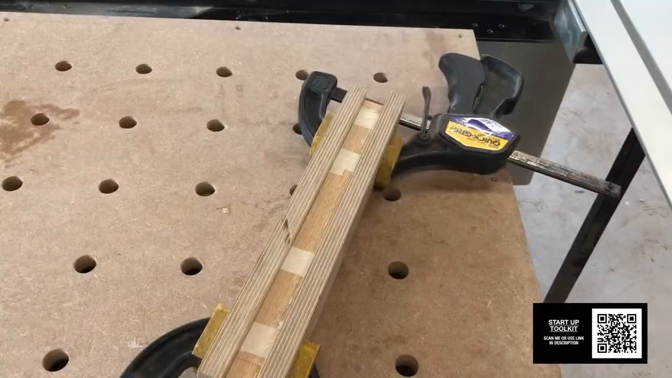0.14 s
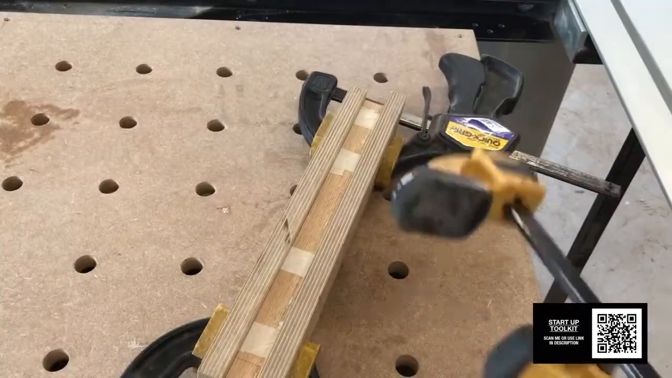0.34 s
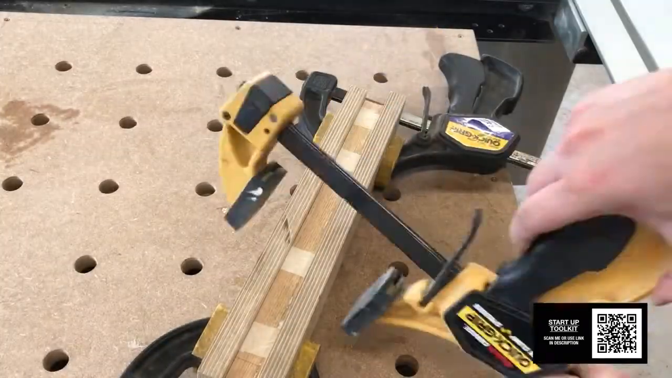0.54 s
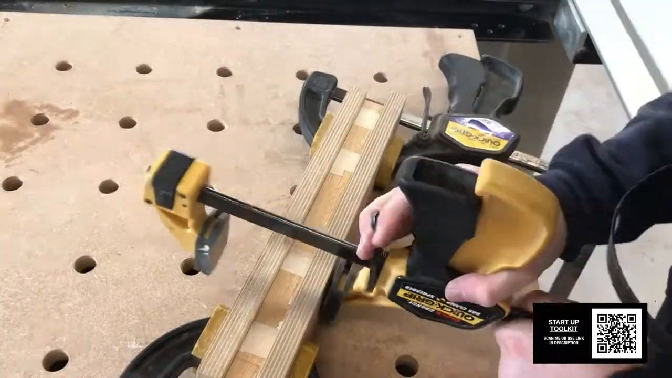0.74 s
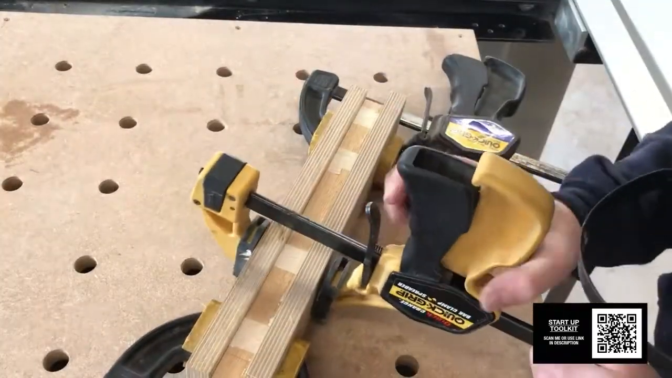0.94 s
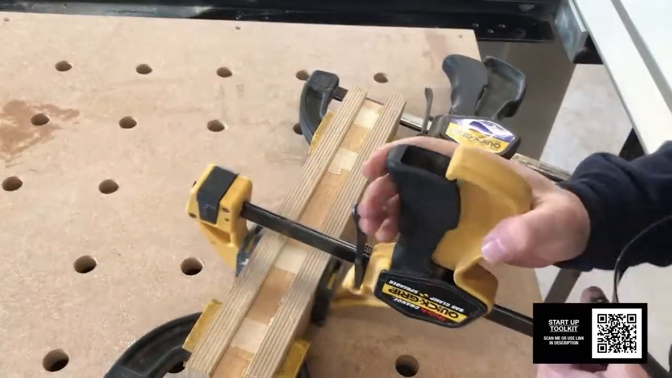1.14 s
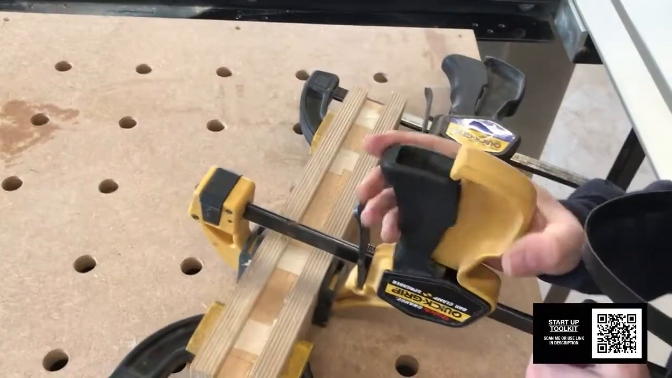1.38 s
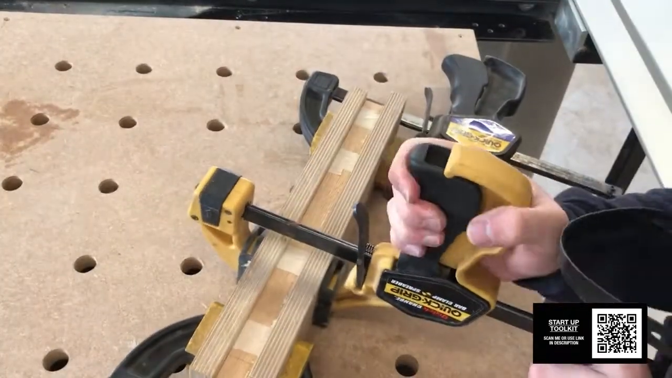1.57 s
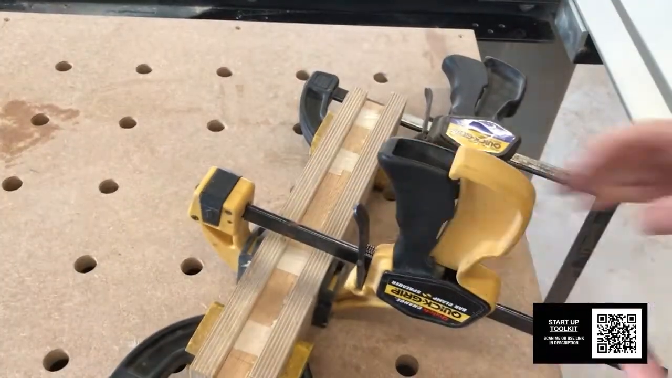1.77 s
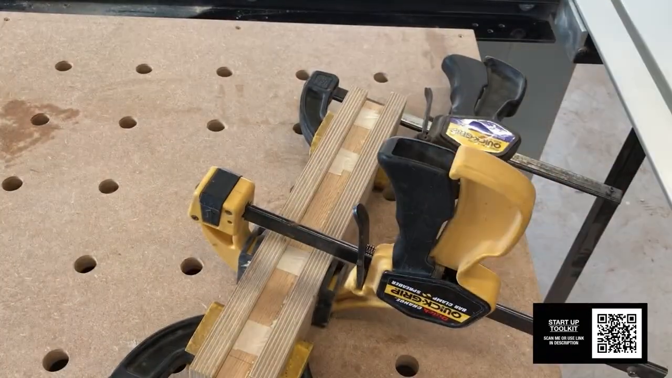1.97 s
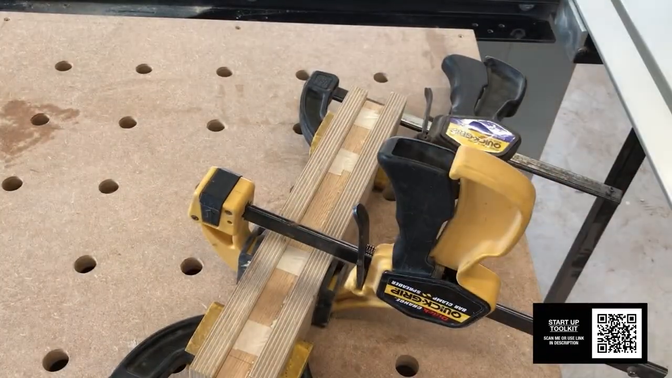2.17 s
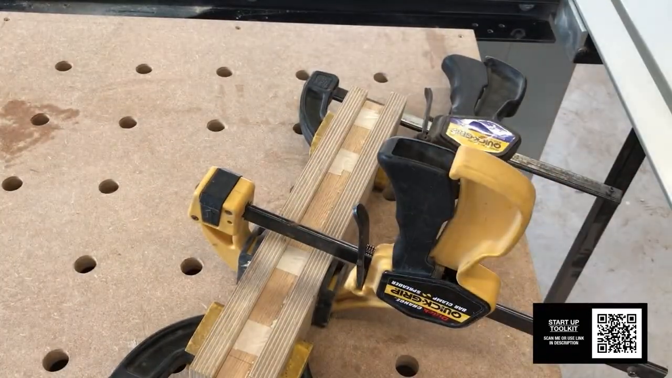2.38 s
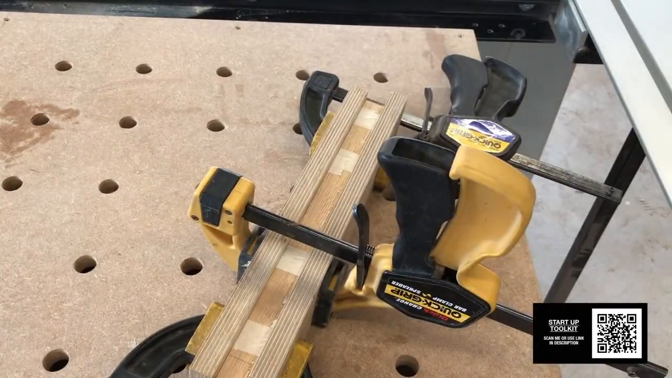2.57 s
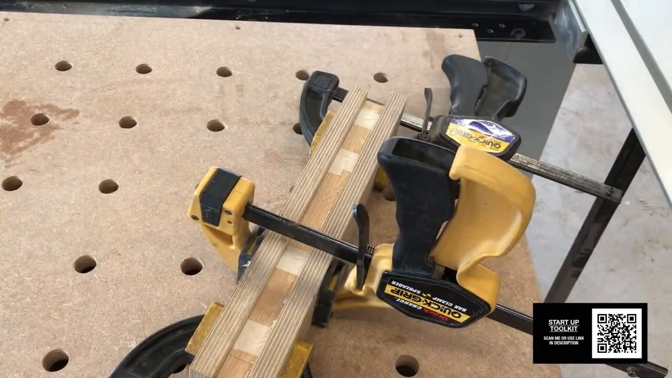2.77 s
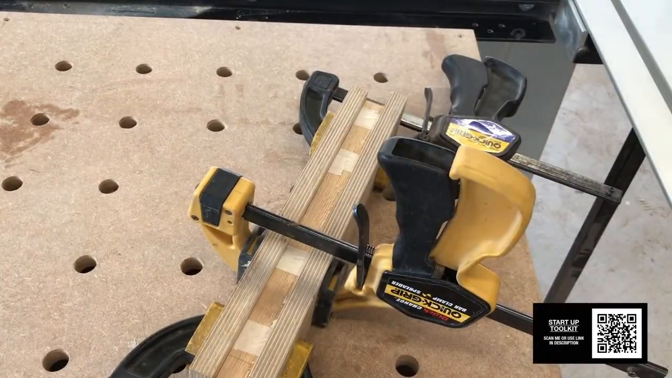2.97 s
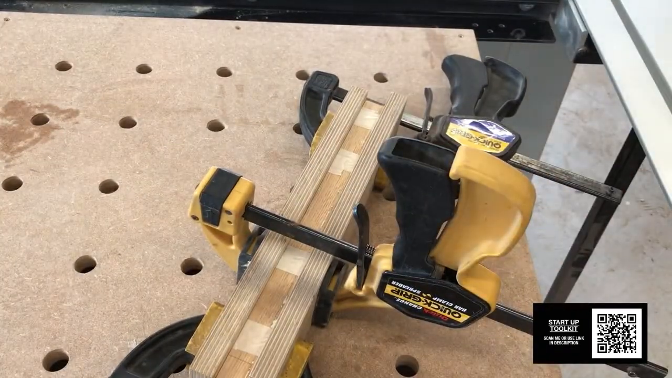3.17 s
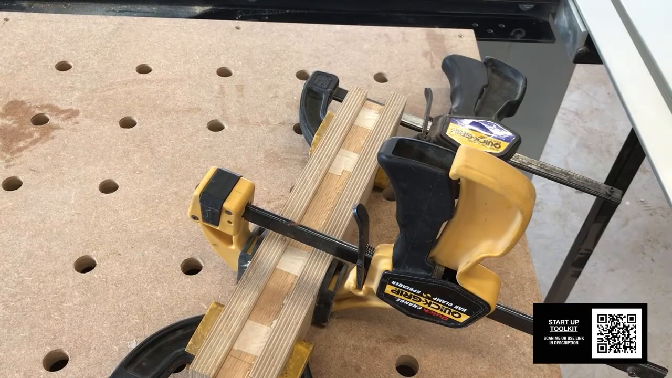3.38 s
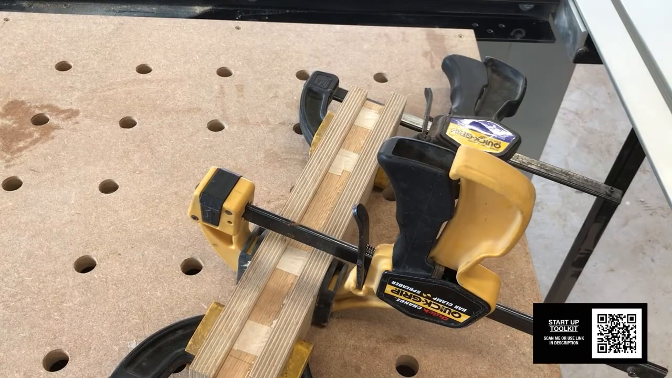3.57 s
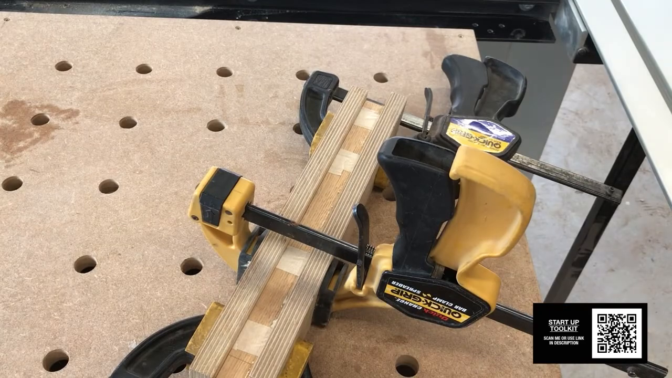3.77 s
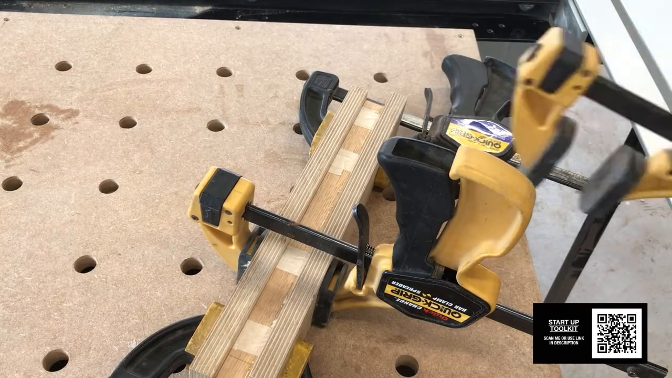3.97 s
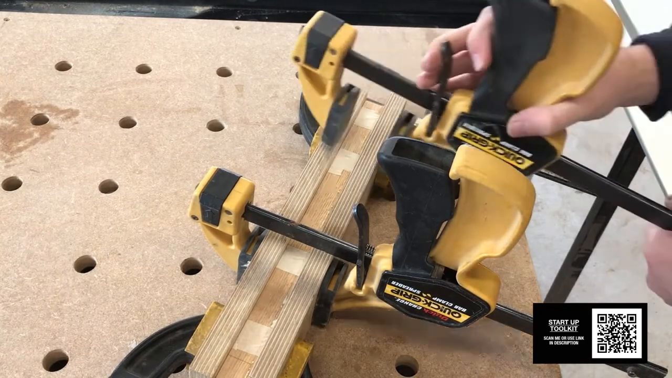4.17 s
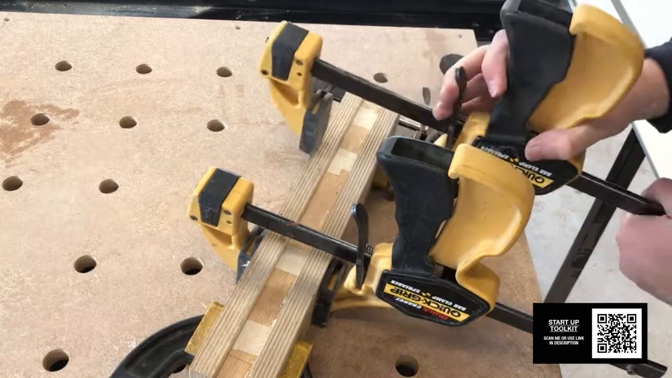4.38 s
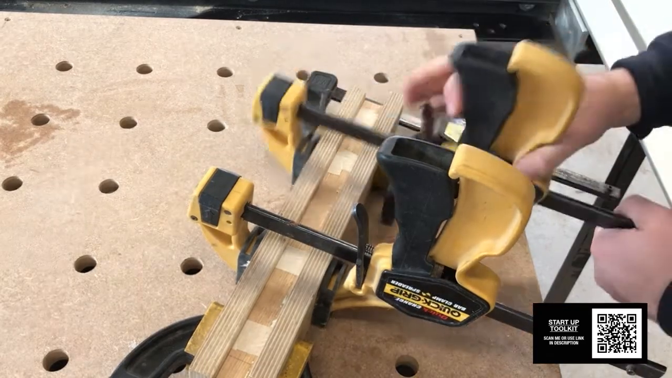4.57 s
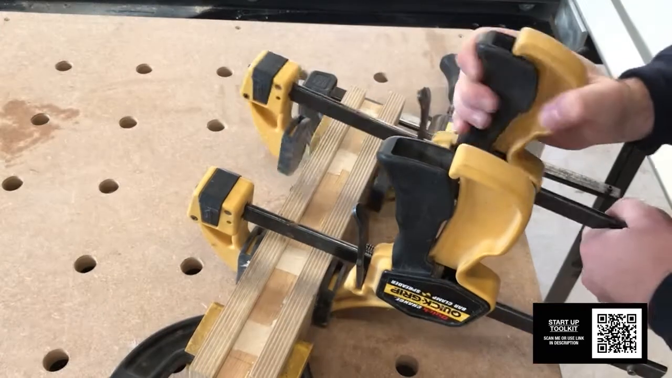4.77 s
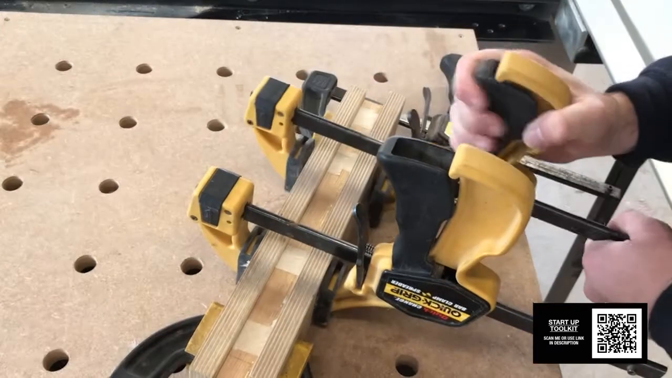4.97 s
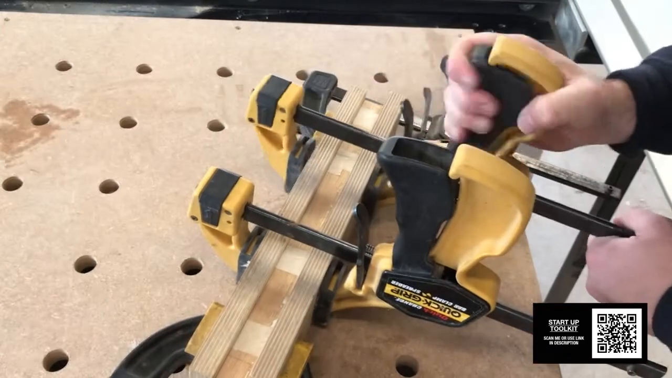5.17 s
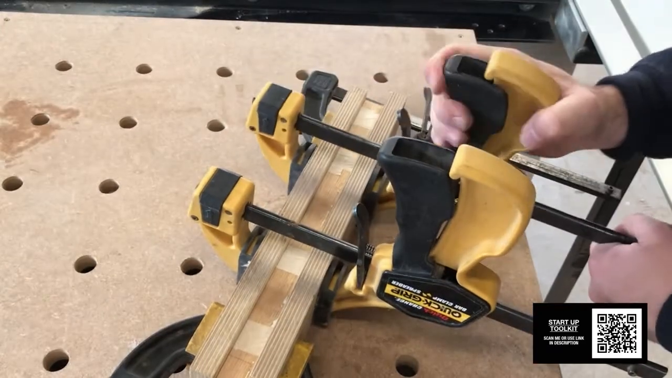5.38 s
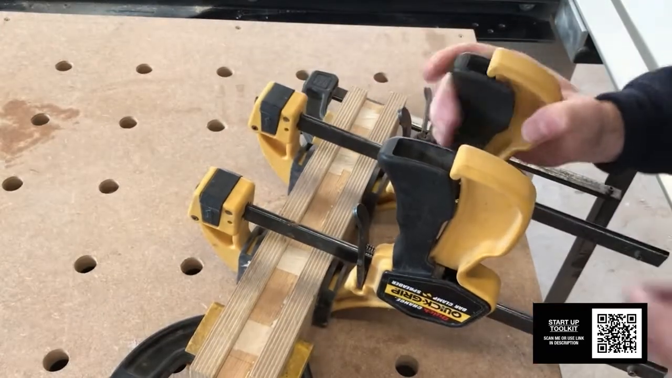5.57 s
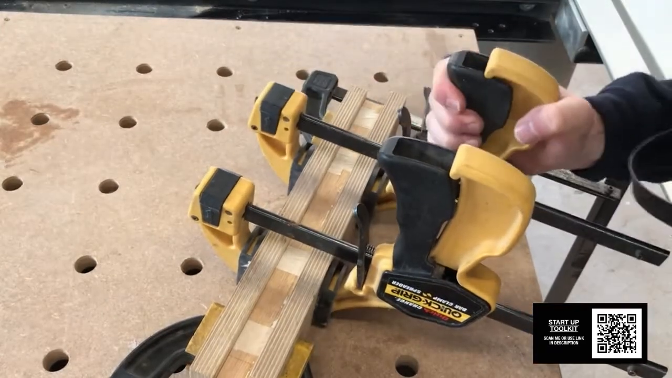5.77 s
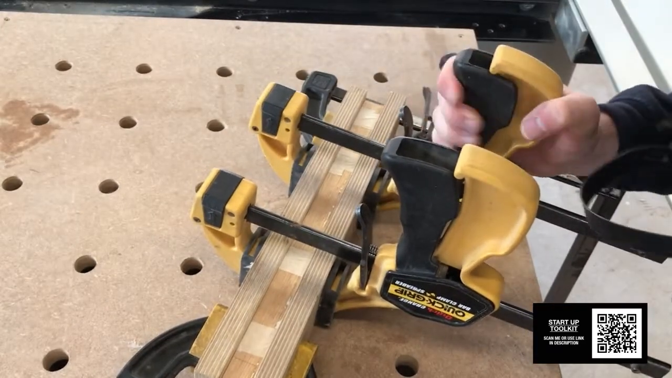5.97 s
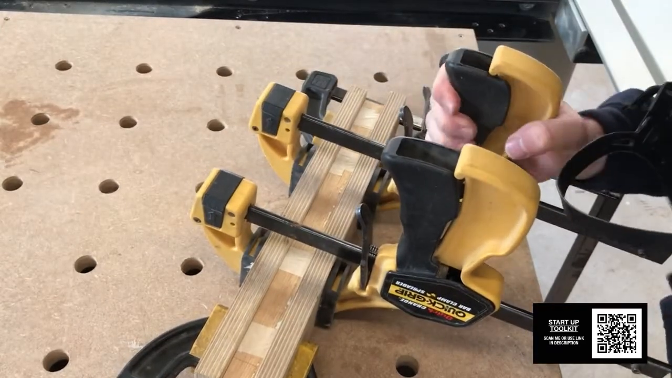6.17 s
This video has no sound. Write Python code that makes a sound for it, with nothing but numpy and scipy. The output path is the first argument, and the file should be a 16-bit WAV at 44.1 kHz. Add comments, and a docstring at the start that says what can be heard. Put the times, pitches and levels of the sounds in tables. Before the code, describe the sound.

A close recording in a small workshop, with faint low rumble, hiss and a short room echo. It opens with a few light steel ticks and a soft hum that dies within half a second. From about 0.6 seconds a bar clamp knocks against a plywood strip on a bench, mixing wooden thuds, plastic clacks and sharp metal snaps. A tiny squeak comes at 1 second, the loudest thud and snap at 1.25, and lighter clicks until 1.7. A lull follows with soft swishes of sleeves and a shoe scuff near 2.6. Around 3.9 seconds a second clamp ticks and rattles faintly, then knocks on the wood from 4.2. As it tightens, its steel bar gives three short, sharp squeaks at about 4.8, 5 and 5.2 seconds and a faint one at 5.4, among clicks. Firmer knocks follow at 5.5 and 5.8, ending with light ticks and rustling just after 6.

```python
"""In a small workshop, two one-handed bar clamps are set on a plywood strip on a bench, close by.
Jaws and handles knock on the wood and make it ring, and the steel catch plates tick as they snap.
The bar squeaks because it sticks and slips as it is dragged through the plates.
Sleeves and shoes swish in between, over the room's low rumble, hiss and a brief hum."""
import sys
import numpy as np
from scipy import signal
from scipy.fft import rfft, irfft, next_fast_len
from scipy.io import wavfile
from scipy.ndimage import uniform_filter1d

SR = 44100
rng = np.random.default_rng(int(sys.argv[2]) if len(sys.argv) > 2 else 0)


def store_wav(level_fs):
    """Save 16-bit WAV to argv[1]."""
    pcm = np.round(np.clip(np.atleast_2d(level_fs), -1, 1) * 32767)
    wavfile.write(sys.argv[1], SR, pcm.T.astype(np.int16))


N = 275182
TIME = np.arange(N) / SR
BLOW = np.arange(SR // 4) / SR  # seconds within one blow
TOP_HZ, SNAP_HZ = 16200, 6640  # upper limit of the sound; middle pitch of a steel snap

# How loud the room and the handled bench rumble. Each row: time in seconds, level in dB.
RUMBLE_LEVELS = [(0.0, -71), (0.59, -68.5), (0.8, -65), (1.18, -65.5), (1.34, -67.5), (1.67, -64),
                 (1.91, -72.5), (3.75, -72), (4.45, -65), (5.09, -64.5), (5.8, -64), (6.24, -67)]


def undb(db):
    """Turn decibels into a number to multiply by."""
    return 10 ** (np.asarray(db) / 20)


def unit(x, size=None):
    """Scale x so that its first size samples have an average strength (rms) of 1."""
    return x / np.sqrt(np.mean(x[:size] ** 2) + 1e-20)


def fade(t60):
    """A fade over one blow that drops by 60 dB every t60 seconds."""
    return np.exp(-np.log(1000) * BLOW / t60)


def colour(x, points, tilt_db=0):
    """Shape the tone by (Hz, dB) points, adding tilt_db of treble per octave above 4 kHz."""
    size = 2 * next_fast_len(len(x) // 2 + 2048)
    f = np.maximum(np.arange(size // 2 + 1) * SR / size, 1)
    hz, db = np.transpose(points)
    gain_db = np.interp(np.log(f), np.log(hz), db) + tilt_db * np.log2(np.maximum(f / 4000, 1))
    # this folding keeps the filter from ringing before a sound starts
    cepstrum = irfft(np.log(undb(gain_db)))
    cepstrum[1:size // 2] *= 2
    cepstrum[size // 2 + 1:] = 0
    return irfft(rfft(x, size) * np.exp(rfft(cepstrum)))[:len(x)]


def band(x, hz, width_hz):
    """Keep only the frequencies around hz."""
    edges = np.clip([hz - width_hz / 2, hz + width_hz / 2], 20, .45 * SR)
    return signal.sosfilt(signal.butter(2, edges, "band", fs=SR, output="sos"), x)


def noise(points, size, tilt_db=0):
    """Noise of strength 1, its tone shaped by (Hz, dB) points."""
    return unit(colour(rng.standard_normal(size), points, tilt_db))


def walk(rate, size=N):
    """A smooth random wobble of strength 1 that turns about rate times a second."""
    hold = max(int(SR / rate), 1)
    steps = np.repeat(rng.standard_normal(size // hold + 2), hold)
    return unit(uniform_filter1d(steps, hold)[:size])


def add(out, start, x):
    """Mix x into out from start seconds on."""
    i = max(int(start * SR), 0)
    out[i:i + len(x)] += x[:max(N - i, 0)]


def ring(modes):
    """The fading tones of a struck object; their mix depends on where the blow lands."""
    chance = rng.standard_normal((len(modes), 3)) * [2, .004, 1]
    return sum(np.sign(side) * undb(db + extra_db)
               * np.sin(2 * np.pi * hz * (1 + detune) * BLOW) * fade(t60)
               for (hz, db, t60), (extra_db, detune, side) in zip(modes, chance))


def bass_step(at_s=2.6, glide_s=0.155):
    """Goes smoothly from 0 to 1 as the recorder's bass cut drops, once."""
    return (1 + np.tanh((TIME - at_s) / glide_s)) / 2


def rumble():
    """The room and the handled bench give a low, wavering rumble."""
    # The rumble's tone. Each row: frequency in Hz, level in dB.
    tone = [(30, -33.5), (70, -27.5), (110, 1.5), (150, -1), (230, 0.5), (330, -2), (600, -10),
            (1500, -27.5), (4000, -49.5)]
    db = np.interp(TIME, *np.transpose(RUMBLE_LEVELS)) + 1
    return noise(tone, N) * undb(db + walk(32))


def rumble_edge(high_hz=133.4, low_hz=90, fade_in_s=0.96):
    """The rumble's wavering low edge, which sinks once as the recorder's bass cut drops."""
    db = np.interp(TIME, *np.transpose(RUMBLE_LEVELS)) - 2.5
    hz = high_hz + (low_hz - high_hz) * bass_step()
    phase = 2 * np.pi * np.cumsum(hz) / SR
    edge = walk(17) * np.cos(phase) + walk(16) * np.sin(phase)
    return undb(db) * np.minimum(TIME / fade_in_s, 1) * edge


def hiss():
    """A faint hiss whose level drifts slowly."""
    # The hiss's tone. Each row: frequency in Hz, level in dB.
    tone = [(100, -5), (600, 12.5), (1500, 12), (4000, -3), (9000, -6.5), (16000, -4.5)]
    return noise(tone, N) * undb(-80 + 1.1 * walk(2.8))


def hum(hz=383):
    """One wavering note that dies away in the first second."""
    db = np.interp(TIME, [0, .28, .45, .7], [-63, -67.5, -75, -103])
    return np.sqrt(2) * np.sin(2 * np.pi * hz * TIME) * undb(db + walk(25))


def snap(hz, tilt_db):
    """A tiny steel snap: a noisy crack and a very short ping."""
    t = BLOW[:SR // 50]
    tone = [(500, -9), (2000, -5.5), (4500, 1.5), (9000, -0.5), (16000, -11.5)]
    crack = noise(tone, len(t), tilt_db) * fade(0.0051)[:len(t)]
    ping = np.sin(2 * np.pi * hz * t) * fade(0.0054)[:len(t)]
    contact = 1 - np.exp(-t / .0003)
    return unit(contact * (unit(crack) + undb(-3.5) * unit(ping)), size=SR // 250)


def ticks():
    """The catch plates sit loosely: they touch lightly, snap, then rattle once."""
    # Snaps of plates and trigger. Each row: start in seconds, level in dB, treble tilt in dB per octave.
    snaps = [(0.026, -40, 5), (0.099, -43, 2.5), (0.1944, -53.5, 4), (0.3143, -48, 0), (0.6211, -57, 10.5),
             (1.005, -45, 2.5), (1.0942, -46.5, -9), (1.1332, -53, -3.5), (1.1848, -49.5, -5),
             (1.2558, -27, -4.5), (1.305, -42, -13.5), (1.3561, -41, 5), (1.4188, -46.5, -3.5),
             (1.7114, -42, 0.5), (3.8643, -56, -0.5), (3.89, -46, 7.5), (4.195, -50.5, 3),
             (4.219, -54.5, -0.5), (4.4609, -51, 0.5), (4.5782, -46, 1.5), (4.962, -42.5, 0.5),
             (5.0568, -52, 1), (5.086, -36, 4), (5.1518, -46.5, 1), (5.1632, -37.5, 3), (5.1767, -37.5, -6),
             (5.282, -47, -4), (5.3725, -47, -9.5), (5.5342, -51, -22.5), (5.5867, -43.5, -9),
             (5.5985, -44.5, -6), (6.0158, -44, -3), (6.1522, -53.5, -12)]
    out = np.zeros(N)
    for (start, db, tilt_db), (lead, gap) in zip(snaps, rng.uniform(.3, 1, (len(snaps), 2))):
        hz = SNAP_HZ * 2 ** (0.08 * tilt_db)  # a brighter snap also rings higher
        click = undb(db) * snap(hz, tilt_db)
        add(out, start - 0.0019 * lead, undb(-27) * click)
        add(out, start, click)
        add(out, start + .013 * gap, undb(db - 20.5) * snap(hz, tilt_db))
    return out


def rattles(per_second=20):
    """Loose parts tick faintly at random while a clamp is in the hand."""
    # When a clamp is held. Each row: start in seconds, end in seconds.
    handling = [(0.0, 1.55), (3.752, 5.75)]
    out = np.zeros(N)
    for start, end in handling:
        count = int(per_second * (end - start))
        for place, force, pitch in rng.random((count, 3)):
            db = -66 + 4.5 * (2 * force - 1)
            click = snap(SNAP_HZ * 2 ** (pitch - .5), tilt_db=-5)
            add(out, start + place * (end - start), undb(db) * click)
    return out


def swishes(rise_share=.34):
    """Sleeves, shoes and sliding pads rub in short grainy swells over a faint rustle of cloth."""
    # Each row: peak time in seconds, length in seconds, level in dB, treble tilt in dB per octave.
    rubs = [(0.061, 0.044, -54, 3.5), (0.365, 0.18, -73, 2.5), (0.781, 0.049, -59, 3),
            (1.664, 0.15, -63.5, 3.5), (1.949, 0.029, -63.5, 3), (2.007, 0.029, -56, 12),
            (2.181, 0.056, -63.5, 2), (2.362, 0.052, -66.5, 1), (2.613, 0.051, -51, -2.5),
            (2.808, 0.027, -57.5, 3), (2.866, 0.044, -60.5, -2), (3.152, .17, -71.5, 2.5),
            (3.312, 0.039, -59.5, 3.5), (3.434, 0.059, -59, -2.5), (3.67, 0.038, -56, 2),
            (3.806, 0.042, -58.5, -1), (3.888, .034, -51.5, 6.5), (3.94, 0.063, -59.5, 2),
            (4.107, 0.034, -56, 3.5), (4.324, 0.035, -55, -1.5), (4.585, 0.013, -47.5, 10),
            (5.605, 0.043, -62, -13), (5.696, 0.07, -65, -1.5), (6.002, 0.089, -62, -0.5),
            (6.182, 0.088, -65.5, -3.5)]
    # The tone of rubbing. Each row: frequency in Hz, level in dB.
    tone = [(400, -2.5), (1200, -13), (2200, -1.5), (3200, 3), (5500, 3), (9000, -2), (16000, -8)]
    grain = undb(2.2 * walk(700) + 1.6 * walk(130))
    out = undb(-80.5 + 2.5 * walk(9)) * unit(grain * noise(tone, N))  # cloth never quite keeps still
    for peak, length, db, tilt_db in rubs:
        rise, fall = length * rise_share, length * (1 - rise_share)
        near = slice(*np.searchsorted(TIME, [peak - 4 * rise, peak + 4 * fall]))
        t = TIME[near] - peak
        swell = 1 / np.cosh(1.37 * t / np.where(t < 0, rise, fall))
        body = unit(band(rng.standard_normal(len(t)), hz=3370, width_hz=970))
        rub = noise(tone, len(t), tilt_db) + undb(-14.5) * body
        out[near] += undb(db) * swell * unit(grain[near] * rub)
    return out


def bend(x, lag):
    """High notes travel faster through bending wood: 1 kHz comes lag seconds later than 4 kHz."""
    f = np.arange(len(x) + 1) * SR / (2 * len(x))
    delay = lag * np.maximum(np.sqrt(4000 / np.maximum(f, 250)) - 1, 0)
    return irfft(rfft(x, 2 * len(x)) * np.exp(-2j * np.pi * np.cumsum(delay) * f[1]))[:len(x)]


def knocks():
    """A jaw or handle hits: the wood thuds, the plastic housing clacks and the bench booms."""
    # Each row: start in seconds, thud level in dB, hardness in dB (how far the clack is above the thud).
    hits = [(0.629, -61.5, -7), (0.6915, -50.5, -1), (0.733, -62, 5.5), (0.792, -60, -3), (0.813, -48.5, 1),
            (1.006, -54, -2.5), (1.0946, -45.5, 9.5), (1.1853, -59, 2), (1.2553, -28.5, -6.5),
            (1.304, -49, 11), (1.4185, -52, 0), (1.654, -50, 6), (4.195, -57.5, 0), (4.206, -51.5, 2.5),
            (4.318, -59.5, 4.5), (4.5467, -53, -10.5), (4.579, -48.5, -8), (4.603, -48, 0.5),
            (4.7072, -56.5, -1), (4.818, -50, -11), (4.894, -60, -19), (4.997, -52.5, 0.5),
            (5.192, -53.5, 10.5), (5.412, -49.5, 3), (5.5341, -42.5, 2.5), (5.7, -58.5, -2),
            (5.7828, -41.5, 1.5), (5.849, -49.5, 2), (6.162, -63, -0.5)]
    # Tones of the strip and bench top. Each row: pitch in Hz, level in dB, seconds to fade by 60 dB.
    wood_tones = [(372, -16, .07), (455, -13, .05), (505, -4, .07), (545, -3, .06), (616, -2, .1),
                  (700, -8, .045), (800, -11, .04), (880, -4, .05), (914, 1, .055), (1083, -2, .07),
                  (1143, -2, .06), (1240, -9, .04), (1365, -9, .05), (1650, -14, .035)]
    board_tone = [(150, -35), (300, -13.5), (480, 16), (1150, -5), (1800, -16.5), (4000, -41.5)]
    clack_tone = [(500, -12.5), (1100, 8), (2300, 1.5), (3600, -10.5), (6000, -13.5), (14000, -50.5)]
    boom_tone = [(40, -12), (90, -2.5), (200, -8), (340, 2), (520, -3), (1200, -40.5)]
    out = np.zeros(N)
    for start, thud_db, hard_db in hits:
        board = noise(board_tone, len(BLOW)) * fade(0.018)
        thud = unit(ring(wood_tones), size=SR // 40) + undb(-1) * unit(board, size=SR // 40)
        clack = noise(clack_tone, len(BLOW)) * fade(0.031)
        boom = noise(boom_tone, len(BLOW)) * fade(0.12) * (1 - fade(0.014))
        # the boom grows with the thud up to a limit; hard, short hits move the bench less
        boom_db = min(thud_db + 0.5, -53.5) - 0.64 * max(hard_db, 0)
        blow = undb(thud_db) * unit(thud, size=SR // 40)
        blow += undb(thud_db + hard_db) * unit(clack, size=SR // 160)
        blow += undb(boom_db) * unit(boom, size=SR // 30)
        add(out, start, bend(blow, lag=0.00108))
    return out


def drag(length, pitch_hz, surge_db, t):
    """Pitch, extra dB and roughness as the bar catches, then breaks loose louder, lower and rougher."""
    slip = (t - length + .0066) / .0038  # passes zero at the last slip, just before the end
    surge = max(surge_db, 0) * np.exp(-slip ** 2 / 2)
    catch = 0.093 * np.exp(-t / .003)  # the pitch starts high and settles
    climb = 3.6 * t  # it creeps up as the pull builds
    sag = .31 * np.tanh(max(surge_db, 0) / 6) * (1 + np.tanh(2 * slip + 1)) / 2
    rasp = np.clip(0.14 + 0.27 * surge, 0, 1)
    return pitch_hz * (1 + catch + climb) * (1 - sag), surge, rasp


def squeaks(attack_s=0.00195, release_s=0.0022):
    """The steel bar sticks and slips in the plates fast enough to make a note, which sets it ringing."""
    # Each row: start and end in seconds, pitch in Hz, level in dB, extra dB as the bar breaks loose.
    drags = [(1.016, 1.029, 2078, -36.5, 0.5), (4.7845, 4.8217, 1473, -36, 14),
             (4.977, 4.9927, 1443, -35.5, 12), (5.171, 5.201, 1444, -41.5, 17),
             (5.387, 5.425, 1376, -50, -0.5)]
    # How well the clamp gives off a squeak. Each row: frequency in Hz, level in dB.
    clamp_tone = [(500, -20), (1300, -6.5), (2000, -12.5), (3000, 0), (3700, 3), (4600, -4), (5500, -4),
                  (6700, 1.5), (7700, -2), (9400, 2), (11000, -1), (16000, -2)]
    # Tones of the bar. Each row: pitch in Hz, level in dB, seconds to fade by 60 dB.
    bar_tones = [(3280, -4, .13), (3670, -4, .11), (3835, -4, .11), (4900, -9, .1), (6660, -4, .13),
                 (7930, -4, .15), (8780, 0, .18), (9420, -1, .15), (9620, 0, .16), (10050, -2, .15),
                 (11580, -8, .12), (12620, -5, .13)]
    out = np.zeros(N)
    for start, end, pitch_hz, hold_db, surge_db in drags:
        t = np.arange(0, end - start, 1 / SR)
        hz, surge, rasp = drag(end - start, pitch_hz, surge_db, t)
        db = hold_db + surge + 1.5 * walk(250, len(t))
        gate = np.minimum(t / attack_s, 1) * np.minimum((t[-1] - t) / release_s, 1)
        wobble = .016 * walk(600, len(t)) + .09 * rasp * walk(2500, len(t))
        phase = 2 * np.pi * np.cumsum(hz * (1 + wobble)) / SR
        edge_hz = 14500 * undb(.72 * (db + 23))  # harder slips sound brighter
        slips = 0
        for k in range(1, 17):  # the note and its overtones
            flutter = 1 + .35 * walk(500, len(t)) + 1.2 * rasp * walk(2200, len(t))
            weight = (k * hz < TOP_HZ) / np.sqrt(1 + (k * hz / edge_hz) ** 4)
            slips = slips + weight * flutter * np.cos(k * phase + rng.uniform(0, 2 * np.pi))
        grit = rasp * edge_hz / TOP_HZ * (1 + np.cos(phase)) * rng.standard_normal(len(t))
        voice = colour(slips / 2 + grit, clamp_tone)
        power = uniform_filter1d(voice ** 2, size=SR // 400)
        add(out, start, gate * undb(db) * voice / np.sqrt(np.abs(power) + 1e-12))
    steel = ring(bar_tones)
    return out + undb(-23) * signal.fftconvolve(out, steel / np.linalg.norm(steel))[:N]


def scuffs(half_length_s=0.013):
    """Soft scuffs and bumps further off in the room, each a puff of noise around one pitch."""
    # Each row: peak time in seconds, pitch in Hz, width of the noise band in Hz, level in dB.
    bumps = [(2.629, 2480, 503, -50.5), (2.63, 1536, 250, -59), (2.648, 963, 40.6, -59),
             (2.83, 198, 30, -50.5), (2.821, 620, 403, -61), (2.872, 1780, 138, -64.5)]
    out = np.zeros(N)
    t = BLOW - BLOW[-1] / 2
    swell = np.exp(-(t / half_length_s) ** 2 / 2)
    for peak, hz, width_hz, db in bumps:
        rub = swell * band(rng.standard_normal(len(t)), hz, width_hz)
        add(out, peak + t[0], undb(db) * rub * np.linalg.norm(swell) / np.linalg.norm(rub))
    return out


def workshop(x, early_db, late_db, early_t60, late_t60):
    """Add quick echoes off the bench, then the short fading echo of the room."""
    echo_tone = [(100, -8), (700, 3), (4000, -4.5), (9000, -6), (16000, -7.5)]
    response = 0
    for db, t60, arrival_s in ((early_db, early_t60, .002), (late_db, late_t60, .008)):
        echoes = noise(echo_tone, len(BLOW)) * fade(t60) * (BLOW > arrival_s)
        response = response + undb(db) * echoes / np.linalg.norm(echoes)
    return x + signal.fftconvolve(x, response)[:N]


def scene():
    """Wood, steel and cloth in one room; the rubs are further off, so they carry more echo."""
    wood = workshop(knocks(), early_db=-11.5, late_db=-14.5, early_t60=.06, late_t60=0.19)
    steel = ticks() + rattles() + squeaks()
    steel = workshop(steel, early_db=-11.5, late_db=-16.5, early_t60=0.063, late_t60=0.23)
    cloth = workshop(swishes() + scuffs(), early_db=-9.5, late_db=-17.5, early_t60=0.046, late_t60=0.31)
    background = rumble() + rumble_edge() + hiss() + hum()
    return (wood + steel + cloth + background)[None]


def record(dry):
    """The recorder cuts the highest treble and the deep bass; its bass cut drops lower partway through."""
    early, late = (signal.sosfilt(signal.butter(4, cut_hz, "high", fs=SR, output="sos"), dry)
                   for cut_hz in (110, 80))
    thin = early + (late - early) * bass_step()
    return signal.sosfilt(signal.ellip(8, .2, 70, TOP_HZ, fs=SR, output="sos"), thin)


dry = scene()
out = record(dry)
store_wav(out)
```